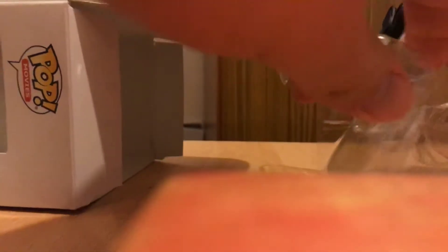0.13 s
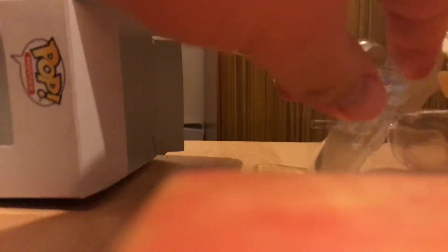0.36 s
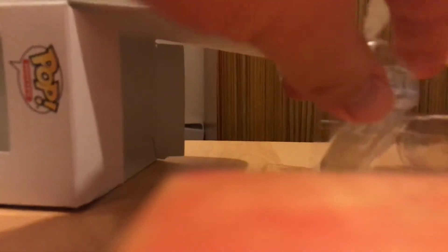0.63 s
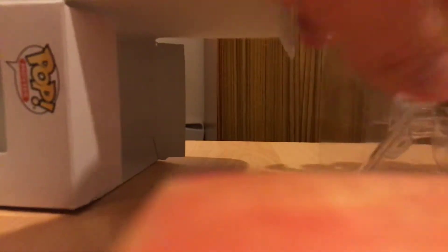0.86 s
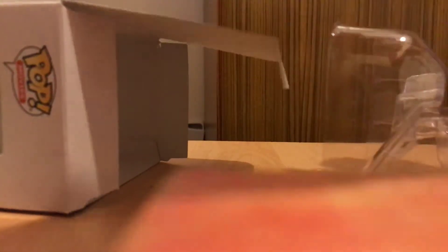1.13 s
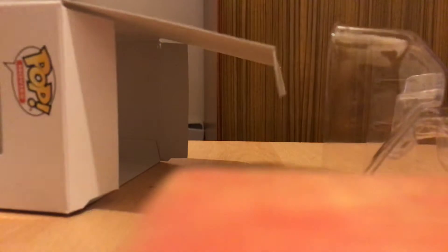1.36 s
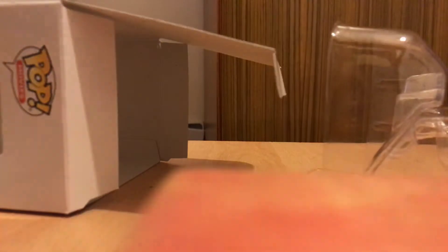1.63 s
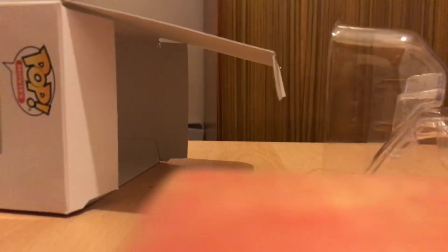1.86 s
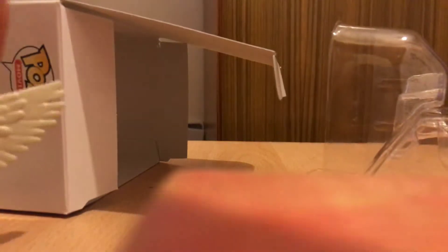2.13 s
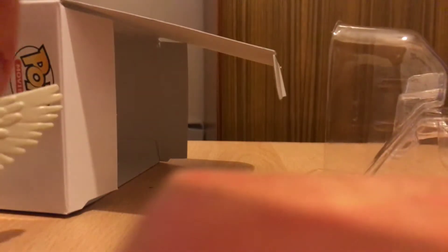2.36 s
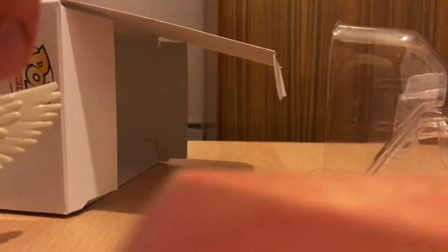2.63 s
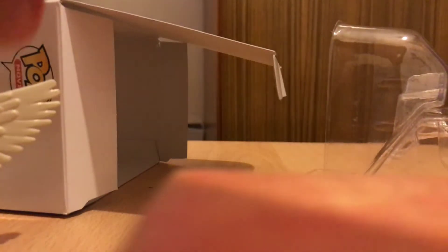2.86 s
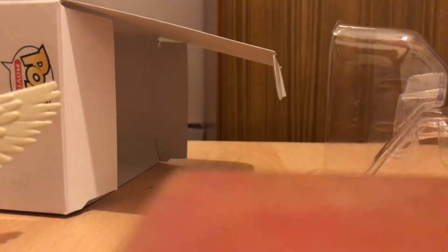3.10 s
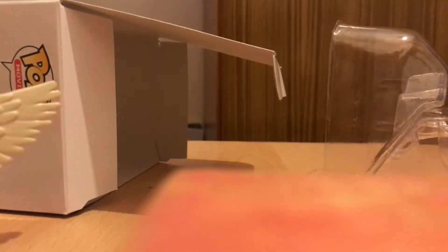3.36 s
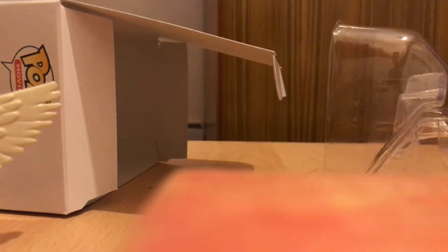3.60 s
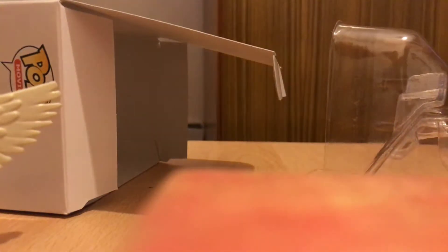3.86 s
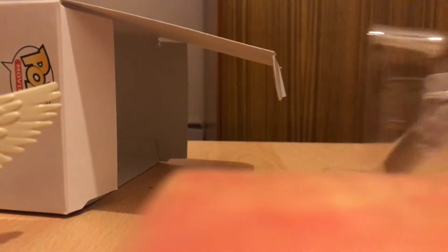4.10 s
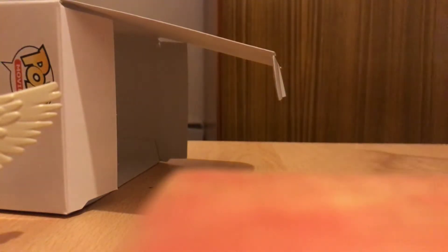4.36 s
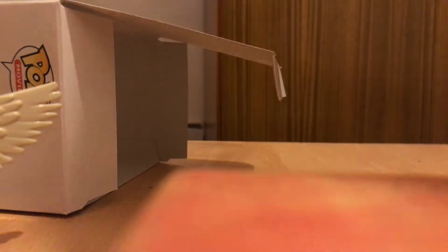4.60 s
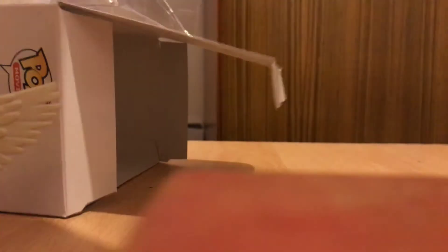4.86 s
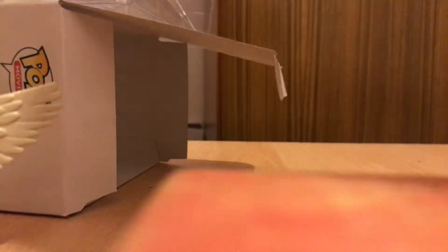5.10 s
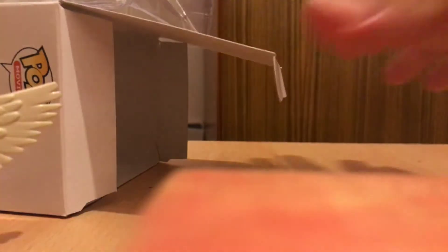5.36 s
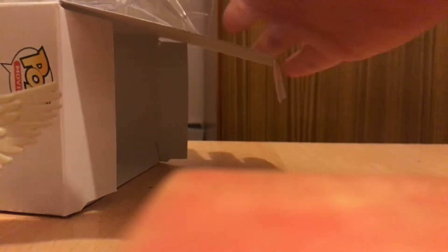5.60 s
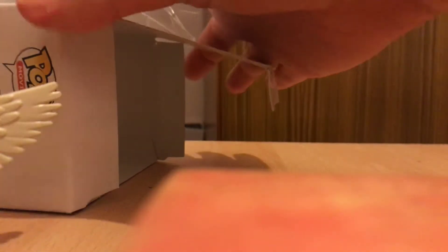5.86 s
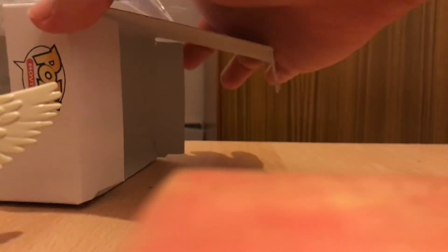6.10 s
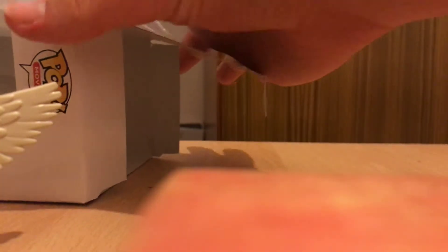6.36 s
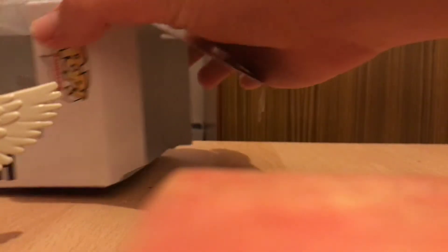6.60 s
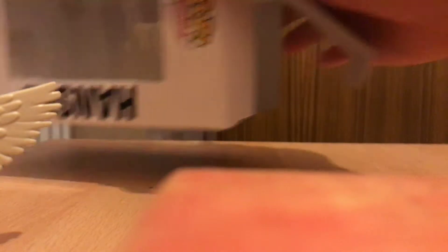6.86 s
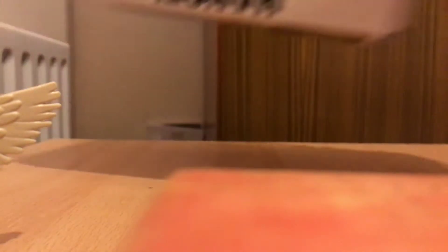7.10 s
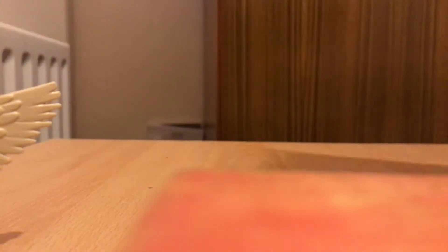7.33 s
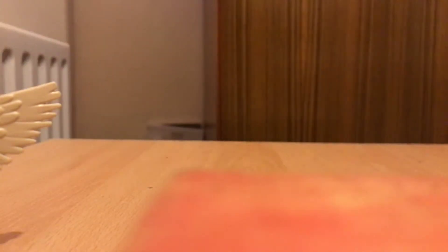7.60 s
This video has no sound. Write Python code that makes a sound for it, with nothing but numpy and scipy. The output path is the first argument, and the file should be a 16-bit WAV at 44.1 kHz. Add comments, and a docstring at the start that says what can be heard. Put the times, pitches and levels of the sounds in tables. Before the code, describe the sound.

In a small quiet room, close to the microphone, hands creak and crackle a thin plastic tray, with a loud clack and soft table thumps early on. Handling fades, then a small figure lands with a sharp wooden knock. After sparse faint rustles the tray judders briefly off the table, crinkles and lands on a cardboard box with a dull knock. The box scrapes softly as it is lifted, and delicate plastic crackles finish.

```python
"""Plastic tray, wooden table and cardboard box

Hands lift a thin plastic tray, set a small figure on a wooden table, lay the tray on a cardboard box
and carry the box off, in a small quiet room. Skin and plastic rub in dense tiny slips, made of random
impulses and noise; the tray cracks as it flexes, in short noise bursts. Knocks ring the table, box and
tray through their own modes; the table top thumps, a tray foot judders and the box scrapes.
"""
import sys
import numpy as np
from scipy import signal
from scipy.fft import rfft, irfft, next_fast_len
from scipy.io import wavfile
from scipy.ndimage import uniform_filter1d

SR = 44100
rng = np.random.default_rng(int(sys.argv[2]) if len(sys.argv) > 2 else 0)


def log_audio(samples):
    """Write samples as a 16-bit WAV file to the path given in sys.argv[1]."""
    # one column per channel
    frames = np.atleast_2d(samples).T
    # limit to full scale, then quantise
    limited = np.clip(frames, -1, 1)
    pcm = np.round(limited * 32767).astype(np.int16)
    wavfile.write(sys.argv[1], SR, pcm)


def how_loud(loudness_db):
    """Turn decibels into a plain amplitude multiplier (0 dB gives 1, 20 dB gives 10)."""
    steps = np.asarray(loudness_db, float) / 20
    return 10 ** steps


N = 340452  # length in samples

# The notes at which each object rings, before any damping by a hand: f/Hz, level/dB, t60/s (time to fall 60 dB)
TABLE_MODES = [(107, 0, 0.085), (140, -10, 0.1), (194, -3, 0.08), (287, -13, 0.05), (366, -11, 0.06),
               (420, -7, 0.075), (493, -10, 0.07), (572, -10, 0.05), (700, -9, 0.03), (880, -5, 0.03),
               (985, -12, .04), (1250, -9, .03), (1450, -6, .025), (1800, -5, .03), (1980, -7, .04),
               (2550, -6, .02)]
BOX_MODES = [(289.7, -2.5, 0.049), (416.7, 0, 0.044), (475, -4, 0.049), (539, 6.5, 0.06), (645, -1.5, 0.04),
             (709, -4.5, 0.043), (930, -4.5, 0.037), (1130, -9, 0.03), (1310, -7, 0.019), (1630, -8, 0.028),
             (2220, -11, 0.022), (2650, -11.5, 0.021)]
TRAY_MODES = [(885, -1, 0.028), (1161, -2.5, 0.0586), (1361, 4, 0.024), (1635, 0.5, 0.038), (1835, 0, 0.02),
              (2180, -15, 0.087), (2205, -10.5, 0.043), (2970, -3.5, 0.035), (3302, -8, 0.075),
              (3940, -4, 0.029), (4760, -3, 0.023), (5410, -7, 0.029), (6470, -21.5, 0.051)]


def unit(x):
    """Scale to rms 1."""
    return x / np.sqrt(np.mean(x ** 2))


def colour(x, points):
    """Filter by (Hz, dB) points joined by straight lines on a log frequency axis."""
    hz, db = np.transpose(points)
    size = next_fast_len(len(x))
    f = np.maximum(np.arange(size // 2 + 1) * SR / size, 1)
    gain = how_loud(np.interp(np.log(f), np.log(hz), db))
    return irfft(rfft(x, size) * gain, size)[:len(x)]


def ring(modes, damping=1., size=11025):
    """Impulse response of dying modes with unit energy; neighbours swing opposite, damping shortens every ring."""
    t = np.arange(size) / SR
    hz, db, t60 = np.transpose(modes)[:, :, None]
    sign = (-1) ** np.arange(len(modes))[:, None]
    decay = np.exp(-np.log(1000) * t * damping / t60)
    h = np.sum(sign * how_loud(db) * np.sin(2 * np.pi * hz * t) * decay, axis=0)
    return h / np.sqrt(np.sum(h ** 2))


def through(x, h):
    """Sound x heard through the response h (convolution), cut to the scene's length."""
    return signal.fftconvolve(x, h)[:N]


def walk(rate):
    """Random levels, each held 1 / rate s, then smoothed twice into a slow wander."""
    k = int(SR / rate)
    steps = np.repeat(rng.standard_normal(N // k + 1), k)
    return 1.1 * uniform_filter1d(uniform_filter1d(steps, k), k)[:N]


def swells(rows):
    """Level tracks: each gesture climbs to its peak and dies away in straight dB slopes; gestures add in power."""
    t, power = np.arange(0, N / SR + .002, .001), 1e-12
    for s, rise, fall, *db in rows:
        # slopes are s per 20 dB, never quicker than 5 ms
        slope_db = -20 * np.where(t < s, (s - t) / max(rise, .005), (t - s) / max(fall, .005))
        power = power + how_loud(np.add.outer(db, slope_db)) ** 2
    return [np.interp(np.arange(N) / SR, t, np.sqrt(p)) for p in power]


def slips(rate, spread_db, patchy_db):
    """Stick-slip of rms 1: random tiny impulses (rate per s), some larger, in patches over a smooth slide."""
    chance = rng.random((N, 2))
    size = how_loud(np.minimum(-spread_db * np.log(chance[:, 1] + 1e-9), 16.))
    jerks = (chance[:, 0] < rate / SR) * size * np.sign(rng.standard_normal(N))
    slide = 0.54 * rng.standard_normal(N)
    return unit((unit(jerks) + slide) * how_loud(patchy_db * walk(90)))


def crackle(rate, spread_db, ms):
    """Creases let go at random: separate short noise bursts of uneven size, rms 1."""
    chance = rng.random((N, 2))
    size = how_loud(np.minimum(-spread_db * np.log(chance[:, 1] + 1e-9), 14.))
    starts = (chance[:, 0] < rate / SR) * size
    fade = np.exp(-np.arange(400) / SR / (ms / 1000))
    return unit(through(starts, fade) * rng.standard_normal(N))


def flexing(x, modes, damping, rate):
    """A thin wall bent by the hand: its modes wander between a low, a middle and a high tuning."""
    shift = 0.091  # bending moves all modes by this share of their pitch
    share = how_loud(5 * np.array([walk(rate) for _ in range(3)]))
    share = share / np.sqrt(np.sum(share ** 2, axis=0))
    out = 0
    for k, weight in zip((-1, 0, 1), share):
        tuned = np.array(modes) * [1 + shift * k, 1, 1]
        out = out + through(x * weight, ring(tuned, damping))
    return out


def air():
    """The room's quiet hush: coloured noise, wavering a little."""
    # tone of the hush: f/Hz, level/dB (relative, per Hz)
    hush_tone = [(18, -36), (32, -6), (200, 1), (460, -8.5), (780, -14.5), (1250, -11), (1800, -20.5),
                 (4780, -23.5), (7090, -24.5), (10200, -31), (16000, -32)]
    level_db = -64 + 1.2 * walk(6)
    return how_loud(level_db) * unit(colour(rng.standard_normal(N), hush_tone))


def room(x):
    """Adds a diffuse tail of fading noise bands, which differ in level and decay time."""
    # echo bands: f/Hz (centre), t60/s, level/dB
    echo_bands = [(161, 0.12, -10), (472, 0.16, -11), (1440, 0.16, -10.5), (4080, 0.21, -15.5),
                  (9600, 0.2, -14)]
    t, h = np.arange(SR // 2) / SR, 0
    for hz, t60, db in echo_bands:
        edges = [hz / 1.7, min(hz * 1.7, 18000)]
        band_filter = signal.butter(2, edges, "band", fs=SR, output="sos")
        band = signal.sosfilt(band_filter, rng.standard_normal(len(t)))
        h = h + how_loud(db) * band * np.exp(-np.log(1000) * t / t60) * np.sqrt(14 / t60 / SR)
    # the tail sets in a few ms after the direct sound
    return x + through(x, h * np.clip(t / 0.0036 - .8, 0, 1))


def thumps():
    """Soft thumps of a hand or edge: the table top bends and swings out at a low pitch set by where it is pressed."""
    # thumps: t/s, level/dB (before the swing's own rise and fall), f/Hz
    presses = [(0.031, -41, 107), (.197, -28, 127), (.398, -36, 110), (.503, -29.5, 130), (.687, -36, 119),
               (.845, -39, 170), (.895, -36, 125.6), (0.929, -38, 126), (1.112, -45.5, 140),
               (1.388, -42, 70), (3.601, -39, 133), (4.834, -32, 149), (4.915, -36, 139),
               (5.107, -37.5, 89), (5.81, -48, 102.5), (6.081, -46, 109), (6.099, -42, 176),
               (6.6, -40.5, 110)]
    rise_s, t60_s = .003, 0.21
    out, t = np.zeros(N + 9000), np.arange(9000) / SR
    shape = (1 - np.exp(-t / rise_s)) * np.exp(-np.log(1000) * t / t60_s)
    for s, db, hz in presses:
        start = int(s * SR)
        out[start:start + len(t)] += how_loud(db) * shape * np.sin(2 * np.pi * hz * t)
    return out[:N]


def scrapes():
    """The open box scrapes over the table: rough slips ring its air hollow and the wall modes nearest the strain."""
    # scrapes: t/s (peak), rise/s per 20 dB, fall/s per 20 dB, hollow drive level/dB, wall drive level/dB,
    # f/Hz (wall modes near this ring most)
    pulls = [(5.75, 0.04, 0, -62, -64, 1200), (5.81, 0.06, 0.07, -47, -62, 1201),
             (5.86, -0.05, 0, -56.5, -62.5, 1200), (6.049, 0, 0.07, -46, -56, 1198),
             (6.19, 0, 0.3, -55, -75, 1199), (6.25, 0.23, -0.23, -55, -62, 1399),
             (6.505, 0, 0.06, -51, -55, 1099), (6.55, 0.12, -0.05, -53, -63, 1398),
             (6.58, .02, 0.11, -53.5, -58, 1100), (6.64, 0.05, 0.03, -56, -46.5, 961),
             (6.658, -0.1, -0.05, -60, -61, 1257), (6.673, 0.15, 0.06, -61.5, -52.5, 1600),
             (6.72, .02, 0, -55.5, -66, 1004), (6.77, -0.14, 0.3, -60, -61, 1199),
             (6.822, 0.06, -0.02, -47, -67, 1201)]
    grit = slips(rate=600.0, spread_db=4.0, patchy_db=4.0)
    hollow_level = swells([row[:4] for row in pulls])[0]
    out = flexing(hollow_level * grit, BOX_MODES[2:5], damping=0.77, rate=12.)
    for s, rise, fall, _, db, near_hz in pulls:
        # 40 dB weaker per octave away from near_hz
        modes = [(hz, m_db - 40 * abs(np.log2(hz / near_hz)), t60) for hz, m_db, t60 in BOX_MODES[6:11]]
        wall_level = swells([(s, rise, fall, db)])[0]
        out = out + through(wall_level * grit, ring(modes, damping=1.3))
    return out


def judder():
    """The tray's foot judders as it is dragged off the table: even stick-slip makes a rough low tone."""
    # course of the judder: t/s, f/Hz (slip rate), level/dB
    course = [(4.07, 162.2, -55), (4.088, 161.2, -42), (4.109, 147.5, -33), (4.15, 110, -38),
              (4.194, 107, -50), (4.23, 112, -68)]
    s, hz, db = np.transpose(course)
    t = np.arange(N) / SR
    gate = uniform_filter1d(1. * (t > s[0]) * (t < s[-1]), size=800)
    rough_hz = np.interp(t, s, hz) * (1 + 0.0398 * walk(60))
    phase = 2 * np.pi * np.cumsum(rough_hz) / SR
    tone = np.sin(phase) + 0.24 * np.sin(2 * phase)
    return np.sqrt(2) * gate * how_loud(np.interp(t, s, db)) * tone


def rubbing():
    """Tiny slips under the hands drive table, box and tray through their own modes; skin and creases add hiss."""
    # fingers sliding over the tray: t/s (peak), rise/s per 20 dB, fall/s per 20 dB,
    # creak drive level/dB, skin hiss level/dB
    strokes = [(0.024, 0.2, 0.13, -34.5, -44), (.138, -1.16, 0.12, -46, -53), (0.257, 0.2, 0.09, -36, -53),
               (0.405, 0, 0.11, -37.5, -51.5), (0.44, 0, 0, -44.5, -55), (.478, 0.2, -0.1, -43, -64),
               (.508, 0.23, 0.14, -40.5, -63), (.585, -0.03, 0.06, -41, -50),
               (.625, 0.15, 0.0256, -35, -49.5), (0.7, 0.08, 0.07, -39.5, -67), (.83, 0.12, 0.14, -42, -64),
               (.928, 0.1, -0.4, -49, -66), (1.03, 0.3, 0.67, -88, -72.5), (1.114, -0.2, 0.54, -82, -65.5),
               (1.232, -0.09, 0.04, -53, -53.5), (1.273, 0.09, 0.1, -46.5, -53),
               (1.32, 0.08, 0, -51.5, -62.5), (1.409, -0.3, 0.27, -59, -63.5), (1.58, 0.16, 0.23, -51, -63),
               (1.804, -0.14, 0.47, -60.5, -66), (2.59, -1.2, 0.1, -70, -76.5),
               (2.929, 0.12, 4.5, -71, -65.5), (3.198, 0.17, 0.23, -50.5, -56),
               (3.59, 0.1, 0.04, -60, -57.5), (3.62, 0.09, 0.24, -50.5, -52), (3.79, 0.36, .05, -64, -57.5),
               (3.88, 0.23, 0.2, -57.5, -62.5), (4.097, 0.07, 0.21, -33.5, -48),
               (4.36, 0.6, 0.76, -54.5, -56), (4.51, 0.56, 0.1, -61, -51), (4.636, 0.35, 0.04, -50.5, -52),
               (4.73, 0, 0.15, -55.5, -80), (4.801, -0.14, 0.04, -47, -73), (4.869, 0.05, 0.1, -43, -57.5),
               (5.029, 1, -1, -72, -75), (5.26, 0.14, 0.27, -58.5, -54.5), (5.5, 0, 0.34, -69, -65.5),
               (5.701, -0.5, -0.16, -53, -52.5), (5.745, 0, 0.25, -60, -74), (5.85, 0.34, -0.1, -60, -84),
               (6.049, 0.02, 0.18, -51, -64), (6.17, -0.26, 0.34, -61.5, -64),
               (6.26, -0.06, 0.05, -67, -63), (6.5, 0.17, 0.05, -59, -73), (6.662, 0.11, -0.09, -50.5, -65),
               (6.771, 1, 1, -67, -90), (6.99, 0.2, 0.5, -67, -61.5), (7.13, 0.18, 0.2, -64, -59),
               (7.42, 0.1, 0.17, -52.5, -51), (7.49, 0.22, 0.19, -45.5, -45.5),
               (7.72, .4, 0.5, -60.5, -60.5)]
    # weight shifts and drags: t/s (peak), rise/s per 20 dB, fall/s per 20 dB,
    # table thrum drive level/dB, box drag drive level/dB
    drags = [(.04, 0.1, 0.05, -41.5, -45), (.138, -0.17, -0.4, -36, -58), (.2, 0.06, 0.03, -35, -59),
             (0.409, -0.06, 0, -48, -40), (.508, -0.06, 0.17, -41, -40.5), (.61, 0.5, 0.23, -45, -49.5),
             (.835, 0.17, 0.15, -46, -46.5), (.925, 0.07, 0.3, -47.5, -63), (1.11, -0.73, 0.1, -49, -57),
             (1.266, -0.4, 0.43, -57.5, -61.5), (1.412, 0.1, 0.8, -62, -70), (1.583, 0.13, 0.1, -51, -54),
             (1.82, -0.5, .5, -72, -64.5), (2.05, -0.03, 0.19, -39.5, -48), (2.262, 0.75, 0, -51.5, -70.5),
             (2.65, 0, 0.14, -62.5, -76), (2.86, -0.7, 0.8, -71.5, -66.5), (2.97, -0.4, 0.5, -63, -75),
             (3.2, 0.17, 0.4, -62, -60.5), (3.34, 0.8, 0, -59.5, -71), (3.611, -0.03, 0.05, -43.5, -50.5),
             (3.75, 0.5, 0.1, -52.5, -67), (3.88, 0, 0.03, -71, -51.5), (3.98, 0.5, -0.3, -58, -77),
             (4.06, 0, 0.65, -50, -57), (4.13, 0.13, 0.19, -42.5, -45), (4.47, 0, 0, -54, -60),
             (4.641, 0.26, -0.06, -53, -55), (4.73, 0.3, -0.5, -71, -68.5),
             (4.85, 0.02, 0.21, -39.5, -46.5), (5.034, 0.5, 0.08, -57, -75), (5.1, 0, 0.24, -55.5, -77),
             (5.26, 0.03, 0, -50.5, -55), (5.45, 0, -0.8, -63, -62), (5.68, 0.4, -1.73, -73, -62.5),
             (5.77, 0, 0.2, -54, -56), (5.82, -0.6, 0, -57, -62), (5.86, 0.3, -0.04, -53, -62),
             (5.99, 0, 1, -57.5, -63.5), (6.07, -0.15, 0.27, -49, -57), (6.258, -0.33, 0.4, -57, -62),
             (6.5, 0, -0.06, -49, -54), (6.59, 0, 0.12, -48, -54), (6.76, -0.06, -0.05, -52, -63),
             (6.82, 0.4, 0, -56, -62.5), (6.99, 1, 0.6, -62, -66.5), (7.491, 0.18, 0.27, -51, -51.5),
             (7.72, -0.15, 0, -48, -42)]
    # hands at rest, one row: table level/dB, box level/dB, creak level/dB, skin level/dB
    resting_db = (-85, -91.5, -88, -79)
    # tone of the plastic rustle and of the skin hiss: f/Hz, level/dB (relative, per Hz)
    rustle_tone = [(1120, -32), (1900, -13), (2480, -2.5), (2700, -9.5), (3330, -8), (5200, -9.5),
                   (6760, -20), (11400, -120)]
    skin_tone = [(2650, -5), (4500, -13.5), (4950, -16.5), (6190, -7.5), (9260, -9), (10400, -8.5),
                 (14500, -12.5), (16000, -11)]

    levels = swells(drags) + swells(strokes)
    table, box, creak, skin = (g + how_loud(db) for g, db in zip(levels, resting_db))
    # the rustle's level lies halfway (in dB) between creak and skin, then 3 dB down
    rustle = how_loud(-3) * creak ** 0.5 * skin ** 0.5

    creases = .6 * crackle(rate=220., spread_db=3., ms=1.2)
    fine = unit(slips(rate=5000., spread_db=1.0, patchy_db=2.0) + creases)
    medium = unit(slips(rate=1800.0, spread_db=2.8, patchy_db=4.0) + 0.6 * creases)
    coarse = slips(rate=1500., spread_db=2.5, patchy_db=4.0)

    table_thrum = through(table * coarse, ring(TABLE_MODES[:3], damping=2.7))
    box_drag = flexing(box * coarse, BOX_MODES[:6], damping=1.8, rate=11.0)
    tray_creak = colour(flexing(creak * medium, TRAY_MODES[:5], damping=1.59, rate=14.),
                        [(300, -5.0), (800, 0.0), (2000, -3.0), (4000, -11.0)])
    ringing_crinkle = unit(flexing(fine, TRAY_MODES[6:12], damping=0.72, rate=6.5))
    crinkle = unit(colour(fine, rustle_tone)) + 0.5 * ringing_crinkle
    skin_hiss = unit(colour(fine + 0.13 * medium, skin_tone))
    return table_thrum + box_drag + tray_creak + rustle * unit(crinkle) + skin * skin_hiss


def cracks():
    """A facet of the tray buckles: a short burst rings the upper tray modes in its own tuning, with a sharp edge."""
    # clear cracks: t/s, burst level/dB (before body and edge are mixed), treble level/dB (drive against the burst)
    buckles = [(0.0252, -10, -20.5), (0.1154, -25.5, -27), (.1345, -29, -14), (.1515, -23, -25),
               (0.181, -26, -18), (0.1941, -0.5, -29), (.345, -40, -20), (.477, -32, -19),
               (.4947, -28, -18), (.5192, -36, -22), (.5437, -51, -12), (.56, -38, -14),
               (0.578, -32.5, -6.5), (0.694, -29, -19.5), (.7152, -33, -19), (.77, -35, -24),
               (0.7926, -29.5, -27), (0.825, -28, -22), (.846, -35, -21), (.89, -36.5, -22),
               (1.1790, -46, -8.5), (1.6616, -42, -31.5), (1.8445, -38, -34), (1.9742, -32, -27),
               (2.01, -42, -26.5), (2.0405, -15.5, -21.5), (2.15, -57, -9.5), (2.1807, -46, -13.5),
               (2.1867, -35.5, -18.5), (2.318, -21.5, -24.5), (2.589, -33, -24), (2.7841, -62, -14),
               (2.9157, -36.5, -11), (3.2, -26.5, -26), (3.272, -35, -40), (3.58, -35, -15.5),
               (3.806, -34.5, -16), (3.8581, -42, -8), (3.8824, -32, -14), (3.914, -29.5, -16),
               (4.007, -39.5, -8), (4.083, -25.5, -24), (4.356, -31, -19), (4.4034, -34, -12),
               (4.4507, -34, -8), (4.4842, -32.5, -9), (4.4967, -31, -10), (4.517, -33, -12.5),
               (4.531, -33, -11), (4.5464, -41, -14), (4.572, -31, -12.5), (4.6129, -35.5, -7),
               (4.6634, -46, -2), (4.6794, -45, -4), (4.699, -35, -12), (4.7144, -37, -16.5),
               (4.7278, -33.5, -13.5), (4.7597, -35.5, -13.5), (4.77, -38, -12), (4.796, -33.5, -14),
               (4.8144, -45, -5), (4.8316, -22.5, -22.5), (4.8614, -44, -4), (4.8948, -43, -1.5),
               (4.9277, -40, -8), (4.9535, -28.5, -10.5), (4.977, -42, -11.5), (4.9964, -56, -8),
               (5.028, -36.5, -8), (5.09, -44.5, -8), (5.102, -47.5, 0.5), (5.3233, -33.5, -16.5),
               (5.3802, -61, -8), (5.436, -36, -15), (5.5018, -44, -10.5), (5.5882, -41.5, -4),
               (5.6079, -32.5, -17.5), (5.6431, -43, -14), (5.6635, -37, -16), (5.68, -36, -18),
               (5.6965, -38.5, -11.5), (6.006, -38.5, -18), (6.106, -44, -17), (6.1185, -44.5, -16),
               (6.152, -34, -11.5), (6.158, -39, -15), (6.1814, -42, -14), (6.1908, -33, -19),
               (6.2034, -41, -13), (6.2188, -37.5, -14), (6.2414, -35, -14), (6.277, -40.5, -11),
               (6.2877, -43, -15), (6.3096, -41, -13), (6.323, -34, -21), (6.472, -47, -15),
               (6.4981, -36, -19), (6.5335, -45, -11), (6.578, -39.5, -22), (6.637, -40, -24),
               (6.8034, -44.5, -5), (6.8563, -39, -13), (6.9745, -42.5, -9), (6.998, -39, -12),
               (7.024, -39, -12), (7.0803, -35, -14), (7.1217, -39, -10), (7.1703, -32.5, -26),
               (7.243, -43, -10), (7.265, -32.5, -11.5), (7.293, -37, -14), (7.31, -44, -10),
               (7.321, -30.5, -15), (7.33, -35.5, -12), (7.339, -40, -7.5), (7.352, -40, -13),
               (7.371, -34, -9), (7.379, -31, -11), (7.421, -32, -11), (7.4275, -27, -13.5),
               (7.44, -32, -9.5), (7.5837, -35.5, -10), (7.598, -34.5, -13), (7.635, -45, -8),
               (7.652, -36.5, -20)]
    facet_spread, facet_db = .08, 3  # random spread of each facet's pitch (share) and mode levels (dB)
    body, edge, t = np.zeros(N + 3000), np.zeros(N + 1500), np.arange(1500) / SR
    upper_modes = TRAY_MODES[4:]
    noise = rng.standard_normal((len(buckles), len(t)))
    facet = rng.standard_normal((len(buckles), 1 + len(upper_modes)))
    snap = 3.1 * (np.arange(len(t)) == 30)
    for (s, db, treble_db), n, own in zip(buckles, noise, facet):
        # a larger facet chatters longer: 2.47 ms at -41 dB
        ms = 2.47 + 0.19 * (db + 41)
        shape = np.exp(-(t / (max(ms, .6) / 1000)) ** 1.4) * np.minimum(t / 0.0016, 1)
        chatter = n * shape / np.sqrt(np.mean((n * shape) ** 2) / np.mean(shape ** 2))
        # the facet flips in one snap; its neighbours chatter around and after it
        burst = how_loud(db) * (chatter + snap)
        pitch = 1 + facet_spread * own[0]
        modes = [(hz * pitch, m_db + facet_db * g, t60) for (hz, m_db, t60), g in zip(upper_modes, own[1:])]
        start = int(s * SR)
        body[start:start + 2999] += signal.fftconvolve(burst, ring(modes, damping=9.8, size=1500))
        # the edge gets an extra 3.4 ms fade
        edge[start:start + len(t)] += how_loud(treble_db) * burst * np.exp(-t / 0.0034)
    treble = colour(edge, [(2000, -36.0), (6000, 6.0), (16000, -1.5)])
    return 0.27 * body[:N] + 1.7 * treble[:N]


def knocks():
    """Each blow is a push and a dying rattle of light contacts, rounded by the contact time, that rings the objects."""
    # blows: t/s, box drive level/dB, table drive level/dB, tray drive level/dB, rattle/ms (fall to 1/e)
    blows = [(.025, -63.5, -34, -31, 20), (.118, -54, -45, -34.5, 4.5), (0.1957, -13, -19, -8.5, 13.7),
             (.471, -46, -50, -38, 8.6), (0.502, -34, -35, -30, 6.9), (0.578, -43, -43, -33, 15),
             (0.693, -35, -47, -36.5, 6.4), (.823, -36, -47, -36, 11), (.928, -38, -37, -38.5, 4.8),
             (1.061, -51.5, -61, -49.5, 6.9), (1.181, -55, -63, -45.5, 5), (1.388, -60, -44, -56.5, 4.1),
             (1.476, -60, -65, -51.5, 5), (1.407, -62, -41, -42, 11), (1.661, -51, -68.5, -41.5, 2.4),
             (1.941, -56, -63, -55, 5), (2.03, -43, -30, -54, 14), (2.0400, -21, -2.5, -22, 1.4),
             (2.164, -45, -38, -65, 4.8), (2.182, -54, -53.5, -52, 8.1), (2.319, -45, -49, -35.5, 3.7),
             (2.586, -52.5, -62, -48.5, 3.5), (3.58, -50, -38.5, -40, 7.7), (4.067, -37.5, -33, -33.5, 13),
             (4.086, -48, -48, -36, 8), (4.121, -46, -50, -33, 5.5), (4.146, -48, -50, -41, 5),
             (4.188, -46, -58, -40, 6), (4.224, -57, -58, -41, 5), (4.796, -45, -63, -45, 24),
             (4.831, -22, -26, -32, 28), (5.1058, -50, -32.5, -34.5, 0.48), (6.057, -46, -52, -51, 21),
             (6.25, -48, -44, -44.5, 4.7), (6.5, -46.5, -46, -48, 9.9), (6.578, -47.5, -53.5, -59, 4),
             (6.637, -45, -49, -53, 3)]
    contact_s = 0.35 / 1000
    push, t = np.zeros((3, N + 4000)), np.arange(4000) / SR
    rattle = rng.standard_normal((len(blows), len(t)))
    contact = np.sin(np.pi * np.clip(t[:200] / contact_s, 0, 1))
    for (s, box_db, table_db, tray_db, rattle_ms), shake in zip(blows, rattle):
        fade = np.exp(-(t / (max(rattle_ms, .5) / 1000)) ** 1.9)
        contacts = 7.8 * (t == 0) + 0.67 * shake * fade
        force = signal.lfilter(contact / contact.sum(), 1, contacts)
        start = int(s * SR)
        push[:, start:start + len(t)] += how_loud(np.array([[box_db], [table_db], [tray_db]])) * force
    box = through(push[0], ring(BOX_MODES, damping=1.9))
    # a table top radiates little under its first mode
    low_cut = signal.butter(4, 88., "high", fs=SR, output="sos")
    table = signal.sosfilt(low_cut, through(push[1], ring(TABLE_MODES)))
    tray = through(push[2], ring(TRAY_MODES, damping=1.1))
    return box + table + tray


def scene():
    """All sources in the room, over its hush."""
    sources = rubbing() + judder() + knocks() + thumps() + cracks() + scrapes()
    return (room(sources) + air())[None]


def low_pass(x):
    """Removes everything above the highest recorded frequency."""
    return signal.sosfilt(signal.butter(12, 16660, fs=SR, output="sos"), x)


def record(dry):
    """A small microphone: no deep bass, a dip near the top and a steep cut above 15.9 kHz."""
    # microphone response: f/Hz, level/dB
    mic_tone = [(20, -46), (45, -5.5), (90, -1), (4300, 0.5), (5000, -1), (5700, 1.5), (9600, 1.5),
                (10400, -5), (11200, 2), (16000, -0.5)]
    top_cut = signal.ellip(8, .2, 30, 15900, fs=SR, output="sos")
    mix = signal.sosfilt(top_cut, colour(dry[0], mic_tone)[None])
    return low_pass(mix)


dry = scene()
out = record(dry)
log_audio(out)
```